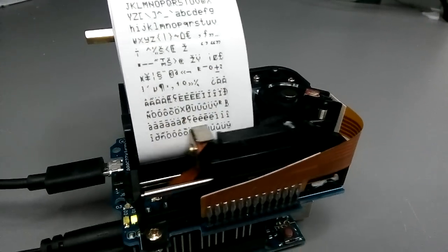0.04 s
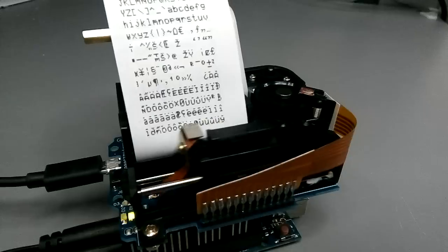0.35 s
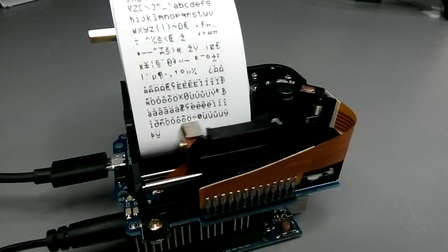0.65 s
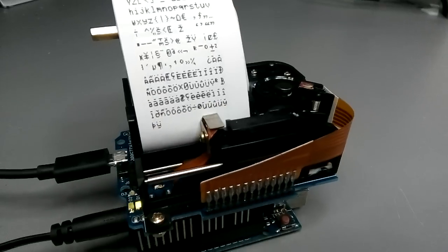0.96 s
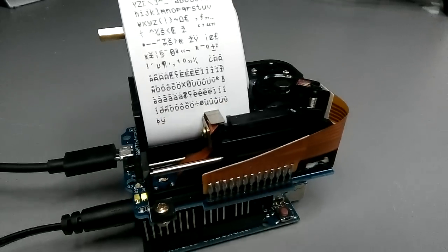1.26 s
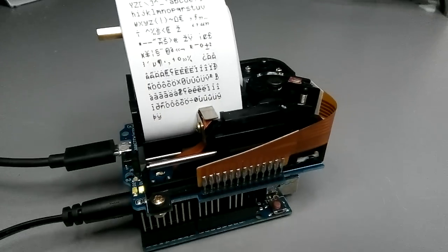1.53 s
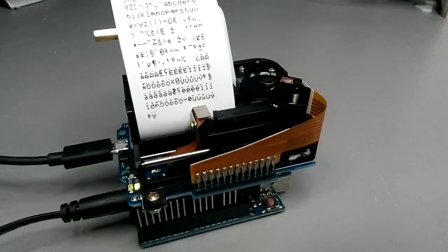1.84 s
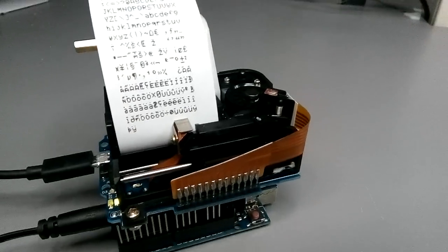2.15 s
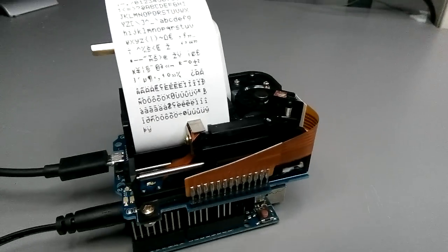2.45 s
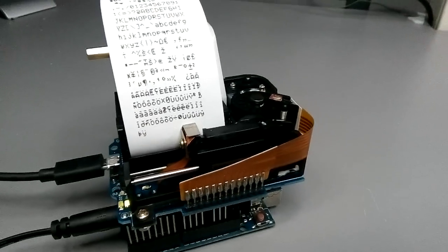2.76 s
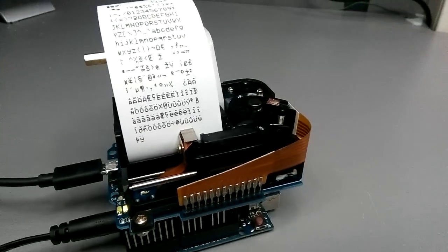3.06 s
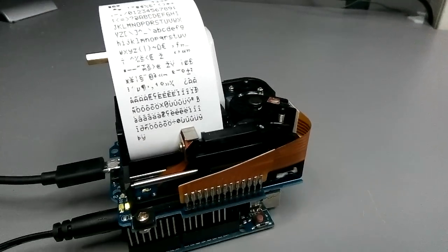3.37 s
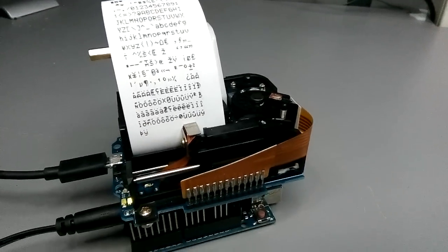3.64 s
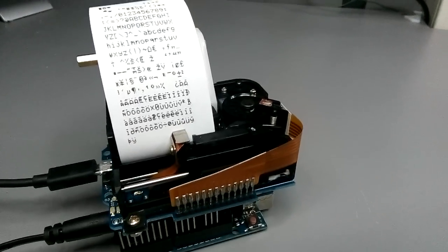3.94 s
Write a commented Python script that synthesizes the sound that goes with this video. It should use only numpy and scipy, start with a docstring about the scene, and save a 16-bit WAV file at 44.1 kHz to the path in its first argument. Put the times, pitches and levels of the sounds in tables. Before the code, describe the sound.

A small thermal printer whines and chatters briefly, then stops, leaving a faint fan hum.

```python
"""Whine and chatter of a small shuttle-head thermal printer on a desk, finishing a line.
It clacks, runs its head back, prints a last stroke and stops within a second.
One motor drives it all: gear teeth whine and rattle the plastic frame, the head chatters over the paper.
Afterwards the fans of nearby equipment hum in the room, with a few faint rustles."""
import sys
import numpy as np
from scipy import signal
from scipy.fft import rfft, irfft
from scipy.io import wavfile

SR = 44100
rng = np.random.default_rng(int(sys.argv[2]) if len(sys.argv) > 2 else 0)


def master_out(mix):
    """Clip the mix to full scale and print it as 16-bit PCM to the path in sys.argv[1]."""
    frames = np.transpose(np.atleast_2d(mix))
    ceiling = np.clip(frames, -1, 1)
    pcm = np.round(ceiling * 32767).astype(np.int16)
    wavfile.write(sys.argv[1], SR, pcm)


N = 176400
TIME_S = np.arange(N) / SR


def undb(db):
    return 10 ** (np.asarray(db) / 20)


def unit_rms(x):
    return x / np.sqrt(np.mean(x ** 2) + 1e-24)


def curve(table, column=1):
    """Table column, linearly interpolated in time."""
    rows = np.array(table, float)
    return np.interp(TIME_S, rows[:, 0], rows[:, column])


def noise():
    return rng.standard_normal(N)


def drift(rate_hz):
    """Unit-RMS noise, low-passed at half the rate."""
    return unit_rms(signal.sosfilt(signal.butter(2, rate_hz / 2, fs=SR, output="sos"), noise()))


def ring(x, hz, width_hz):
    """Resonance, unity gain at centre."""
    return signal.lfilter(*signal.iirpeak(hz, hz / width_hz, fs=SR), x)


def steep_ring(x, hz, width_hz):
    return ring(ring(x, hz, width_hz), hz, 2 * width_hz)


def resonate(x, modes):
    """Bank of steep-skirted resonances, unit RMS."""
    f = np.arange(N // 2 + 1) * SR / N
    power = sum((undb(db) / (1 + 2 * ((f - hz) / width_hz) ** 2)) ** 2 for hz, width_hz, db in modes)
    return unit_rms(irfft(rfft(x) * np.sqrt(power), N))


def colour(x, spectrum):
    """Spectral shaping over log frequency, unit RMS."""
    hz, db = np.array(spectrum, float).T
    f = np.maximum(np.arange(N // 2 + 1) * SR / N, 1)
    return unit_rms(irfft(rfft(x) * undb(np.interp(np.log(f), np.log(hz), db)), N))


# air spectrum: f/Hz, gain/dB
AIR_SPECTRUM = [(15, -50.5), (25, -22), (75, -7.5), (120, -8.5), (160, -5), (300, -3.5), (430, -10.5),
                (624, -4), (880, -14), (1520, -10.5), (3500, -21.5), (5880, -23.5), (8140, -47),
                (13200, -46), (16000, -31)]
# air level: t/s, bass/dB, middle and treble/dB
AIR_LEVELS = [(0, -53, -50.5), (1.1, -62, -58), (2.05, -57.5, -58), (2.2, -62, -56), (3.05, -58, -56),
              (3.3, -55.5, -56), (3.48, -63, -55), (3.62, -50, -54.5), (4, -55, -55)]
# fan tones: f/Hz, width/Hz, level/dB
FAN_TONES = [(248, 3.2, -68), (376, 20, -70.5), (633, 45, -74.5), (968, 32, -68), (1004, 22, -71.5)]


def fans(bass_top_hz=300, middle_top_hz=2200, flicker_db=2.08):
    """Moving air, fluttering in bass and middle, steady in the treble, plus wavering fan tones."""
    air = colour(noise(), AIR_SPECTRUM)
    bass = signal.sosfiltfilt(signal.butter(2, bass_top_hz, fs=SR, output="sos"), air)
    middle = signal.sosfiltfilt(signal.butter(2, middle_top_hz, fs=SR, output="sos"), air) - bass
    treble = air - bass - middle
    bass_db, upper_db = curve(AIR_LEVELS, 1), curve(AIR_LEVELS, 2)
    rush = bass * undb(bass_db + flicker_db * drift(rate_hz=9.97))
    rush += middle * undb(upper_db + flicker_db * drift(rate_hz=18))
    rush += treble * undb(upper_db)
    hum = sum(undb(db) * unit_rms(steep_ring(noise(), hz, width_hz)) for hz, width_hz, db in FAN_TONES)
    return rush + hum


def bursts(contacts):
    """Noise bursts, one resonance each; longer ones swell more gently."""
    out = np.zeros(N)
    for start_s, peak_db, hz, width_hz, decay_s in contacts:
        attack = np.clip((TIME_S - start_s) / (0.3 * decay_s), 0, 1)
        decay = np.exp(-np.abs(TIME_S - start_s) / decay_s)
        burst = steep_ring(noise() * attack * decay, hz, width_hz)
        out += undb(peak_db) * burst / np.abs(burst).max()
    return out


# rustles: t/s, peak/dB, f/Hz, width/Hz, decay/s
RUSTLE_BURSTS = [(2.1, -58.5, 5500, 1000, 0.23), (3.445, -58.5, 5670, 2050, 0.033),
                 (3.72, -58, 5700, 495, 0.022), (3.893, -53.5, 5760, 410, 0.01)]


def rustles():
    """Faint, high rustles after the printer stops."""
    return bursts(RUSTLE_BURSTS)


def reflections(x, tail):
    """Convolution with a tail scaled to unit energy."""
    return signal.fftconvolve(x, tail / np.sqrt(np.sum(tail ** 2)))[:N]


def room(x, t60_s=0.25, wet_db=-16, damping_hz=2020):
    """Direct sound plus a short, dull room tail."""
    tail = signal.lfilter(*signal.butter(1, damping_hz, fs=SR), noise())
    tail *= np.exp(-np.log(1000) * TIME_S / t60_s)
    return x + undb(wet_db) * reflections(x, tail)


def desk(x, decay_s=0.0014, wet_db=-12.5):
    """Direct sound plus quick reflections off desk and circuit boards, unit RMS."""
    tail = noise() * np.exp(-TIME_S / decay_s)
    return unit_rms(x + undb(wet_db) * reflections(x, tail))


# carriage knocks: t/s, peak/dB, f/Hz, width/Hz, decay/s
CARRIAGE_KNOCKS = [(.303, -21, 6700, 710, .004), (.565, -37, 292, 112, 0.029), (.771, -24, 1740, 300, 0.01)]


def knocks():
    """The head carriage knocks and rings briefly."""
    return bursts(CARRIAGE_KNOCKS)


# carriage modes: f/Hz, gain/dB, decay/s
CLACK_MODES = [(4160, -3, 0.0019), (5700, 0, .0008), (7370, -4, 0.00058)]


def clack(start_s=.2546, level_db=-9.5, rise_s=.0004):
    """One sharp blow on the carriage as the head lifts off at the end of the line."""
    age_s = np.maximum(TIME_S - start_s, 0)
    modes = sum(undb(level_db + db) * np.sin(2 * np.pi * hz * age_s) * np.exp(-age_s / decay_s)
                for hz, db, decay_s in CLACK_MODES)
    return modes * (1 - np.exp(-(age_s / rise_s) ** 2))


def teeth(phase, count=10, wear_db=1, scatter_db=2.5, grit=0.67):
    """Each tooth strikes early or late, then scrapes; wear repeats every turn of the gear."""
    backlash, scrape_decay = 0.298, 0.5  # in tooth spacings, like phase
    tooth = phase.astype(int)
    wear = unit_rms(rng.standard_normal(count))[tooth % count]
    force = undb(wear_db * wear + scatter_db * noise()[tooth])
    since_strike = phase % 1 - .5 - .5 * np.tanh(2 * backlash * noise()[tooth])
    strike = np.sinc(since_strike / np.gradient(phase))
    scrape = np.exp(-(since_strike % 1) / scrape_decay) * noise()
    return unit_rms(force * (strike - strike.mean())) + grit * unit_rms(force * scrape)


# drive force, also used by gear_whine and head: t/s, frame/dB, gear train/dB, head/dB
DRIVE_LEVELS = [(0, -37.5, -33, -29), (.045, -35, -31.5, -24.5), (.19, -39, -32.5, -26),
                (.243, -40, -36.5, -35.5), (.278, -45, -38, -38.5), (.31, -37.5, -33.5, -33),
                (.55, -36, -32.5, -31), (.588, -41, -37.5, -36.5), (.608, -39, -35, -29),
                (.7, -35.5, -31.5, -24), (.76, -37.5, -33, -24), (.783, -37, -36, -35),
                (.812, -38, -41, -36), (.865, -80, -105, -100)]
# frame and gear train resonances: f/Hz, width/Hz, gain/dB
FRAME_MODES = [(391, 18, -6), (606, 160, -12), (821.4, 49.8, -7), (963, 45, 0.5), (1127, 28, 0.5),
               (1369, 44.4, -1), (1561, 355, -5.5), (1789, 82, 0), (2040, 260, -6.5)]
TRAIN_MODES = [(2570, 92.7, -2.5), (2944, 560, -5), (3362, 110, 1), (3693, 700, 2.5), (4225, 190, -4)]


def gear_rattle(phase):
    """Loose teeth shake the frame and the brighter gear train."""
    frame = desk(resonate(teeth(phase), FRAME_MODES)) * undb(curve(DRIVE_LEVELS, 1))
    train = desk(resonate(teeth(phase), TRAIN_MODES)) * undb(curve(DRIVE_LEVELS, 2))
    return frame + train


def mesh_harmonic(phase, order, waver_db=3.0):
    """One harmonic of the gear mesh, wavering in level."""
    return np.sin(2 * np.pi * order * phase) * undb(waver_db * drift(rate_hz=90))


# mesh harmonics, dipping at load changes: t/s, first/dB, second/dB, third/dB
WHINE_LEVELS = [(0, -48, -48, -42), (.036, -50, -52, -50), (.055, -37.5, -38, -50),
                (.15, -37.5, -39.5, -45), (.18, -36, -46, -39), (.22, -48, -40, -42), (.255, -54, -40, -50),
                (.282, -66, -58, -60), (.305, -54, -40, -56), (.342, -54, -44, -56), (.41, -54, -33, -43),
                (.465, -50, -48, -35), (.51, -54, -39.5, -43), (.575, -54, -39.5, -46),
                (.596, -58, -54, -56), (.645, -52, -42, -40), (.678, -48, -52, -50),
                (.705, -36.5, -38.5, -44), (.762, -36.5, -49, -40), (.783, -56, -52, -54),
                (.812, -54, -43, -50), (.85, -74, -64, -84)]


def gear_whine(phase, mode_hz=4182, mode_width_hz=150, mode_db=-5.5):
    """Three mesh harmonics until the motor stops; a frame mode sings as the fourth crosses it."""
    tones = sum(undb(curve(WHINE_LEVELS, order)) * mesh_harmonic(phase, order) for order in (1, 2, 3))
    sing = ring(mesh_harmonic(phase, order=4), mode_hz, mode_width_hz)
    sing *= undb(mode_db + curve(DRIVE_LEVELS, 2))
    running = TIME_S < WHINE_LEVELS[-1][0]
    return np.sqrt(2) * (tones + sing) * running


# head on paper: down/s, up/s
PRINT_STROKES = [(-.1, .235), (.595, .81)]
# head resonances, pressed and sliding: f/Hz, width/Hz, gain/dB
PRESSED_MODES = [(4790, 130, -8.5), (5540, 170, -3), (5826, 130.3, 5), (6470, 140, 4.5), (6780, 200, -2)]
SLIDING_MODES = [(5660, 830, 1.5), (6450, 1230, -1), (7083, 120, -9.5)]
# sliding contact fizz: f/Hz, gain/dB
FIZZ_SPECTRUM = [(5000, -15), (7900, 3), (8900, 5), (10500, -5.5), (13300, -5.5), (15000, 6.5),
                 (16000, 3.5)]


def head(phase, mesh_hz, press_s=0.0246, press_share=0.96, fizz_db=-12.5):
    """The head hisses and fizzes as it slides, rings when pressed, and squeals at one motor speed."""
    squeal_hz, squeal_width_hz, squeal_db = 6020, 170, -5  # head mode met by the sixth harmonic
    pressed = press_share * sum(np.clip(np.minimum(TIME_S - down_s, up_s - TIME_S) / press_s, 0, 1)
                                for down_s, up_s in PRINT_STROKES)
    chatter = np.sqrt(pressed) * desk(resonate(teeth(phase), PRESSED_MODES))
    hiss = np.sqrt(1 - pressed) * desk(resonate(teeth(phase), SLIDING_MODES))
    detuning = 2 * (6 * mesh_hz - squeal_hz) / squeal_width_hz
    squeal = undb(squeal_db) * mesh_harmonic(phase, order=6) / np.hypot(1, detuning)
    fizz = undb(fizz_db) * desk(colour(teeth(phase), FIZZ_SPECTRUM))
    return undb(curve(DRIVE_LEVELS, 3)) * (chatter + hiss + squeal + fizz)


# motor speed, sagging while the head presses on the paper: t/s, gear mesh f/Hz
MOTOR_SPEED = [(0, 1040), (.03, 1031), (.048, 971), (.145, 965.3), (.195, 1007), (.275, 1029), (.295, 1085),
               (.335, 1050), (.41, 1031), (.47, 1010), (.588, 1007), (.604, 1077), (.665, 1030),
               (.69, 969.4), (.765, 977.6), (.805, 1060)]


def printer(flutter=.005):
    """One motor paces whine, rattle and head; the carriage adds its clack and knocks."""
    mesh_hz = curve(MOTOR_SPEED) * (1 + flutter * drift(rate_hz=161))
    phase = np.cumsum(mesh_hz) / SR
    return gear_whine(phase) + gear_rattle(phase) + head(phase, mesh_hz) + clack() + knocks()


def scene():
    """The printer in its room, over fans and rustles; mono."""
    return (room(printer()) + fans() + rustles())[None]


def record(dry):
    """Steep low-pass on the top treble."""
    cutoff_hz = 15750
    return signal.sosfilt(signal.ellip(10, .2, 80, cutoff_hz, fs=SR, output="sos"), dry)


dry = scene()
out = record(dry)
master_out(out)
```